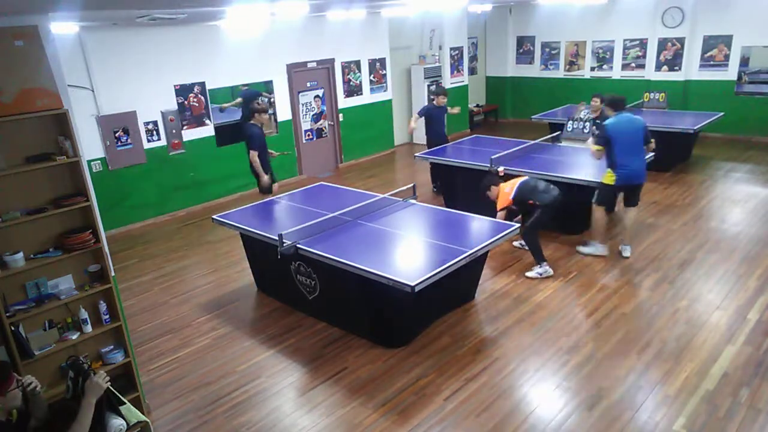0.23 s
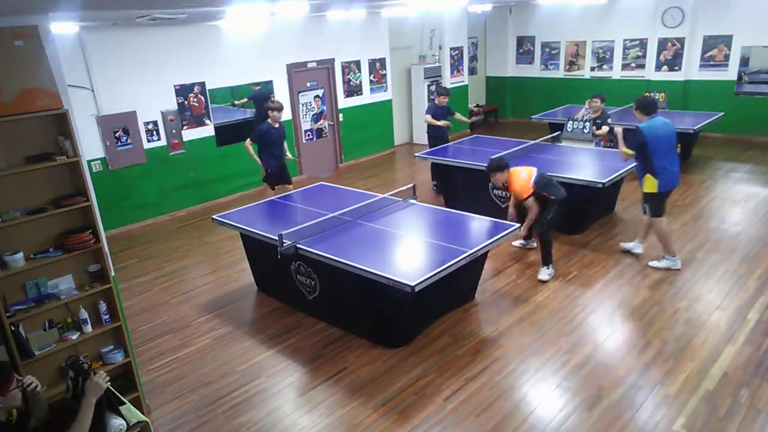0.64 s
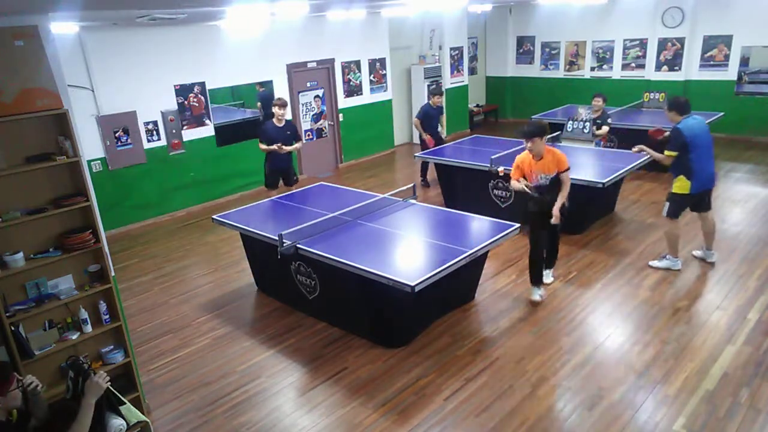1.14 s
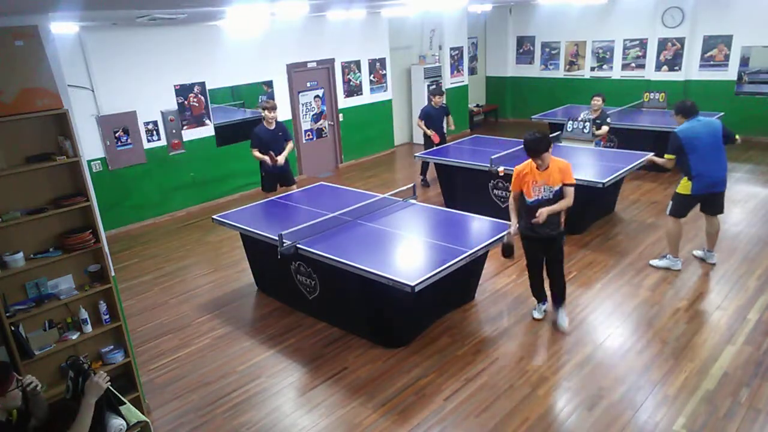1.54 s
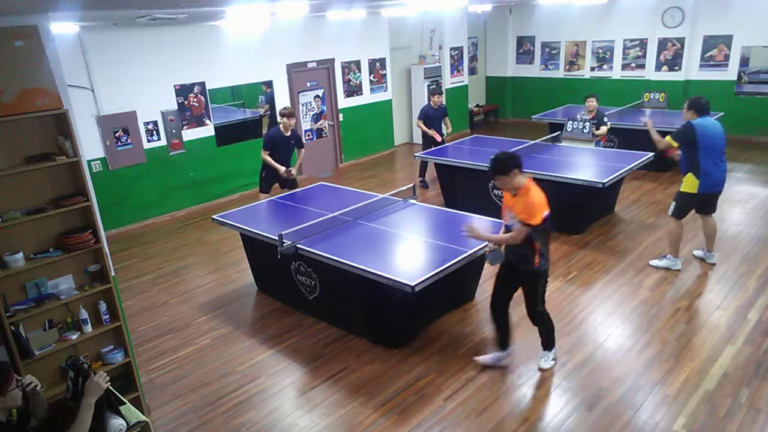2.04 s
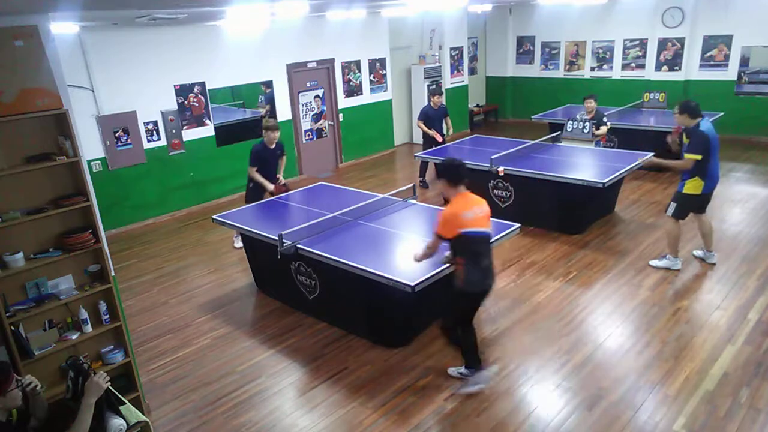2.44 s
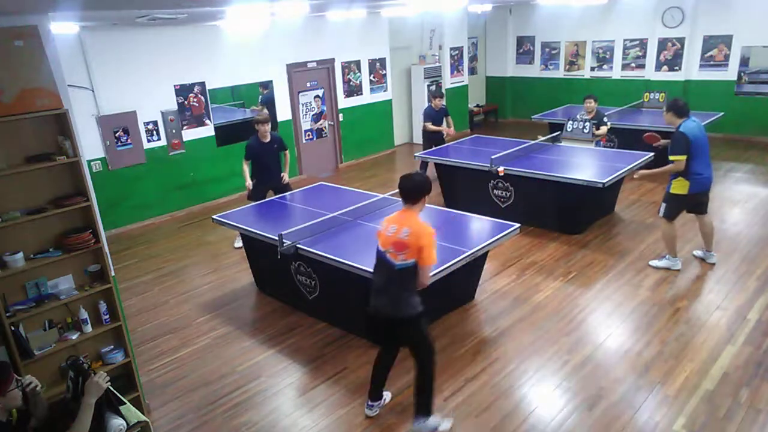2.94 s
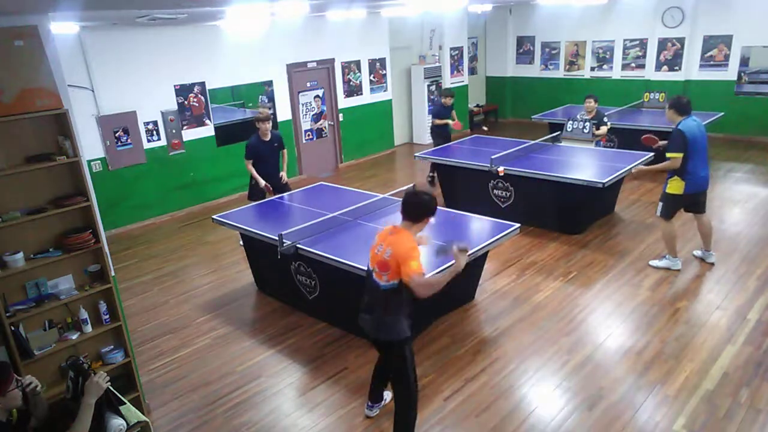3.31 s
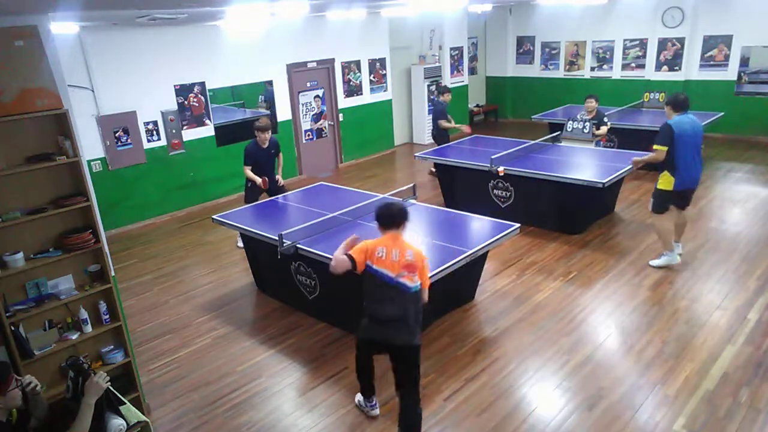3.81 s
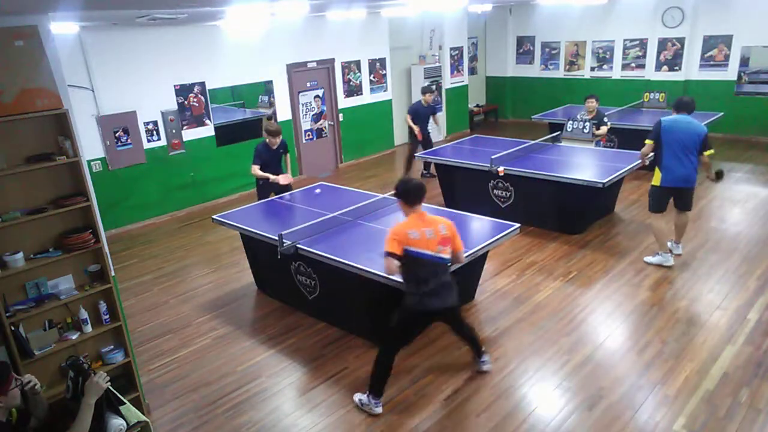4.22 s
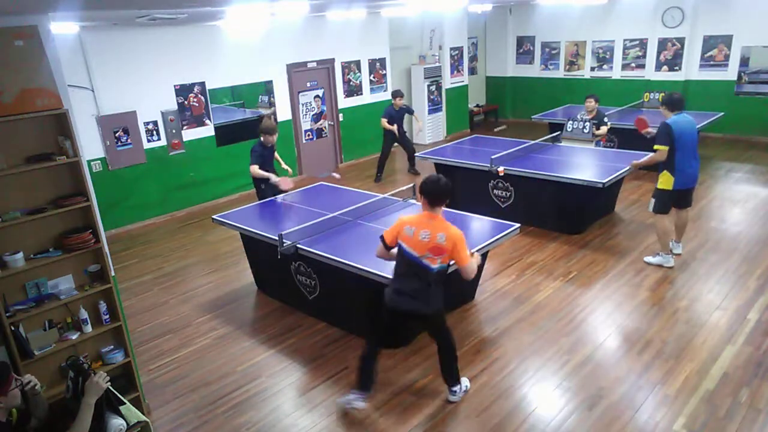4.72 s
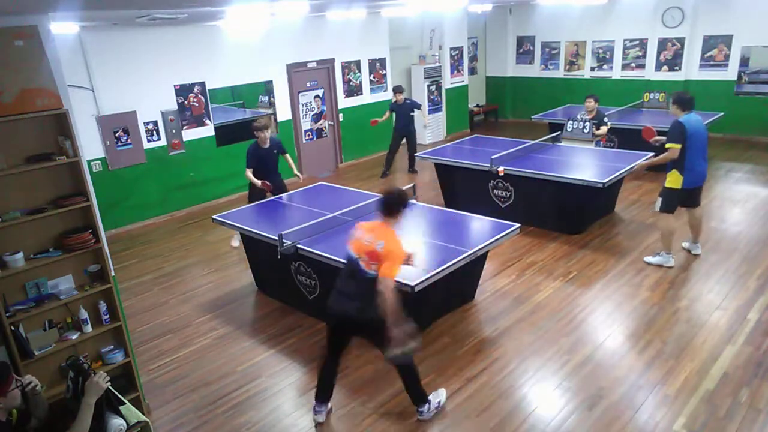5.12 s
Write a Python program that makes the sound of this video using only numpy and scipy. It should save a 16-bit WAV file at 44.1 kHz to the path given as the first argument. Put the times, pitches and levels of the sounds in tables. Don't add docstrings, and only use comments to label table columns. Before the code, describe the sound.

A shoe knocks onto wooden boards, followed by two ball bounces. Soles squeak briefly on varnish among faint distant knocks, then separate ball clicks lead to a quick run of bounces. A hollow serve and a heavy, slightly overloaded stamp open a closer rally with footsteps and scuffs. The hard hall rings around each click, heard by a distant microphone with noise suppression cutting the tails short.

```python
import sys
import numpy as np
from scipy import signal
from scipy.fft import rfft, irfft, next_fast_len
from scipy.io import wavfile
from scipy.ndimage import uniform_filter1d

SR = 44100
rng = np.random.default_rng(int(sys.argv[2]) if len(sys.argv) > 2 else 0)


def waveform_to_disk(signal):
    frames = np.transpose(np.atleast_2d(signal))
    scaled = np.clip(frames, -1, 1) * 32767
    samples = np.round(scaled).astype(np.int16)
    wavfile.write(sys.argv[1], SR, samples)


def undo_db(level):
    steps = np.asarray(level, float) / 20
    return 10 ** steps


N = 236420

# frequency [Hz], level [dB per Hz].
HUM = [(30, -54.5), (120, -23.5), (170, -13.5), (250, 2), (500, 1.5), (1000, -2), (2500, -9.5),
       (4200, -12.5), (5500, -12), (6800, -17), (9000, -29), (15000, -32.5)]


def along(points, hz):
    point_hz, value = np.transpose(points)
    return np.interp(np.log(hz + 1), np.log(point_hz + 1), value)


def peak(hz, centre_hz, width_hz):
    return 1 / np.sqrt(1 + (2 * (hz - centre_hz) / width_hz) ** 2)


def noise(gain):
    m = next_fast_len(N)
    spectrum = rfft(rng.standard_normal(m)) * gain(np.fft.rfftfreq(m, 1 / SR))
    x = irfft(spectrum, m)[:N]
    return x / x.std()


def swells(rows):
    t = np.arange(N) / SR
    gain = np.zeros(N)
    for s, db, rise_s, fall_s in rows:
        away = np.where(t < s, (s - t) / rise_s, (t - s) / fall_s)
        gain += undo_db(db - 20 * away)
    return gain


def ventilation():
    return undo_db(-47) * noise(lambda hz: undo_db(along(HUM, hz)))


def floor_boom():
    # loudest moment [s], level [dB], rise [s per 20 dB], fall [s per 20 dB].
    steps = [(.003, -47, 0.02, .012), (.07, -87, .04, .24), (.68, -78, 0.17, .14), (1.21, -78, .2, .13),
             (1.7, -76, 0.2, 0.23), (2.4, -77, .08, .2), (3.64, -72.5, 0.093, 0.45),
             (3.87, -57.5, 0.062, 0.78), (4.42, -86, 0.054, 0.16), (4.58, -53, 0.051, 0.16),
             (5, -72, 0.59, 0.35), (5.36, -87, 0.13, .1)]
    boards = noise(lambda hz: peak(hz, 91, 50) ** 2 + 1.4 * peak(hz, 115, 21) ** 2)
    return undo_db(2.5) * swells(steps) * boards


def slides():
    # loudest moment [s], level [dB], rise [s per 20 dB], fall [s per 20 dB].
    drags = [
        (.984, -59.5, .02, 0.033),
        (1.02, -63.5, .04, 0.11),
        (1.1, -55, 0.044, 0.12),
        (1.22, -65.5, 0.16, 0.11),
        (3.206, -55.5, 0.023, 0.03),
    ]
    # centre [Hz], width [Hz], level [dB].
    squeal = [(2265, 690, -0.5), (3810, 90, -2), (5300, 530, -10.5), (5550, 930, -2.5), (7200, 110, -4.5),
              (7800, 810, -26.5), (8270, 58, -9)]
    rubber = noise(lambda hz: sum(undo_db(db) * peak(hz, c, w) ** 2 for c, w, db in squeal))
    return undo_db(9) * swells(drags) * rubber


def causal(gain_db):
    cepstrum = irfft(np.log(undo_db(gain_db) + 1e-6))
    half = len(cepstrum) // 2
    cepstrum[1:half] *= 2
    cepstrum[half + 1:] = 0
    return irfft(np.exp(rfft(cepstrum)))[:half]


def click(colour_db, tilt_db, smear_s):
    hz, t = np.fft.rfftfreq(2048, 1 / SR), np.arange(400) / SR
    rough = rfft(rng.standard_normal(400) * t ** 2 * np.exp(-t / smear_s), 512)
    contact = irfft(rough / np.sqrt(np.abs(rough) + 1e-12))
    octaves = np.clip(np.log2((hz + 1) / 1000), -3.5, 2.4)
    x = np.convolve(causal(colour_db + tilt_db * octaves), contact)
    return x / np.abs(x).max()


def hall_tail():
    # frequency [Hz], decay time t60 [s], build-up [s].
    room = [(96.4, 0.37, 0.15), (300, 1.39, 0.019), (1040, 1.47, 0.01), (4230, 1.203, 0.0067),
            (8140, 0.81, 0.009), (14700, 0.39, 0.012)]
    hz, t, z = signal.stft(rng.standard_normal(SR), SR, nperseg=256)
    centre, t60, build = np.transpose(room)
    t60 = along(np.transpose([centre, t60]), hz)[:, None]
    build = along(np.transpose([centre, build]), hz)[:, None]
    z = z * undo_db(-60 * t / t60) * (1 - np.exp(-t / build))
    tail = signal.istft(z, SR, nperseg=256)[1][:SR]
    t = np.arange(SR) / SR
    lumps = np.repeat(rng.standard_normal(SR // 64 + 1), 64)[:SR]
    return tail * np.clip(t / 0.0025, 0, 1) * undo_db(6.4 * lumps * np.exp(-t / 0.016))


def blow_colour(body, band_db, knock_hz, knock_db, comb_hz, mirror):
    # low edge [Hz], high edge [Hz].
    bands = [(220, 361.5), (640, 1438), (2700, 5320), (7400, 11100)]
    hz = np.fft.rfftfreq(2048, 1 / SR)
    edges, width = np.ravel(bands), np.diff(bands)[:, 0]
    per_hz = np.array(band_db) - 10 * np.log10(width / (SR / 2))
    balance = along(np.transpose([edges, np.repeat(per_hz, 2)]), hz)
    share = mirror * np.clip(hz / 2200, 0, 1) ** 2
    comb = np.abs(1 + share * np.exp(2j * np.pi * hz / comb_hz))
    knock = knock_db * peak(hz, knock_hz, 0.15 * knock_hz)
    modes = uniform_filter1d(rng.standard_normal(len(hz)), size=7) * np.sqrt(7)
    modes *= 1.6 * np.clip(hz / 2500, .3, 1)
    octaves_below = np.clip(np.log2(edges[0] / (hz + 1)), 0, 2)
    light = 0.9 * min(per_hz[0] - per_hz[1], 0) * octaves_below
    return along(body, hz) + balance + 20 * np.log10(comb) + knock + modes + light


def strike(body, smear_s, wall_tilt_db, s, db, weight_db, bright_db, knock_hz, knock_db, comb_hz, mirror,
           tilt_db, direct_db, fizz_db, wall_db, wall_s):
    band_db = (db + weight_db, db, db + bright_db, db + fizz_db + bright_db)
    colour_db = blow_colour(body, band_db, knock_hz, knock_db, comb_hz, mirror)
    top_db = db + max(bright_db, 0) - 0.5
    direct = undo_db(top_db + direct_db) * click(colour_db, tilt_db, smear_s)
    tail = undo_db(-4.0) * signal.fftconvolve(causal(colour_db), hall_tail())
    first = undo_db(top_db + wall_db) * click(colour_db, wall_tilt_db, smear_s=.0008)
    second = undo_db(top_db + wall_db - 16) * click(colour_db, wall_tilt_db, smear_s=.0008)
    return [(s, direct), (s, tail), (s + wall_s, first), (s + 2 * wall_s, second)]


def kind(rows, own, **shared):
    columns = ("s", "db", "weight_db", "bright_db", own)
    return [dict(zip(columns, row), **shared) for row in rows]


def play(blows, body, smear_s, wall_tilt_db):
    out = np.zeros(N + 2 * SR)
    for blow in blows:
        for s, part in strike(body, smear_s, wall_tilt_db, **blow):
            out[round(s * SR):][:len(part)] += part
    return out[:N]


def shoes():
    # frequency [Hz], level [dB].
    sole = [(60, -62.5), (150, -14.5), (250, -1.5), (1500, -6.5), (2500, -2.5), (5200, 0), (6500, -3.5),
            (10000, -12.5), (14500, -29.5), (16000, -57)]
    # start [s], hall level [dB], weight = bass over knock [dB],
    # brightness = click over knock [dB], delay of the nearest wall [s].
    stamp = [
        (3.825, -21, 5, -2.9, .0095),
    ]
    steps_down = [
        (4.549, -31, 0.5, 3.7, .011),
        (5.354, -39, -13, 12.3, 0.0025),
    ]
    landing = [
        (.002, -24, -8.5, -5, .065),
    ]
    scuffs = [
        (2.679, -31, -33, -7.5, 0.013),
        (5.189, -32.5, -22.5, -8, 0.023),
    ]
    # the same columns, but the last is the knock's pitch [Hz].
    knocks = [
        (0.581, -70, -10, 13, 4100),
        (1.142, -54, -28, -19.5, 1055),
        (1.165, -48.5, -32, -13, 760),
        (1.316, -51, -27, -10, 2350),
        (1.318, -50.5, -42, -14.5, 1150),
        (2.376, -45.5, -24, 2.5, 1460),
        (3.419, -59.5, -8, 8.5, 2470),
    ]
    blows = (
        kind(stamp, "wall_s", knock_hz=320, knock_db=1.5, comb_hz=1730, mirror=0.2,
             tilt_db=3.5, direct_db=15.5, fizz_db=-13, wall_db=15.5)
        + kind(steps_down, "wall_s", knock_hz=393, knock_db=3, comb_hz=1540, mirror=0.087,
               tilt_db=2.0, direct_db=10.5, fizz_db=-9, wall_db=4)
        + kind(landing, "wall_s", knock_hz=707, knock_db=10.0, comb_hz=1576, mirror=0.067,
               tilt_db=-0.5, direct_db=13, fizz_db=-3.5, wall_db=-10)
        + kind(scuffs, "wall_s", knock_hz=1500, knock_db=-6, comb_hz=1650, mirror=.25,
               tilt_db=5, direct_db=6, fizz_db=6, wall_db=-5)
        + kind(knocks, "knock_hz", knock_db=11, comb_hz=1490, mirror=0.17,
               tilt_db=1.0, direct_db=20, fizz_db=-30, wall_db=18.5, wall_s=0.017))
    return play(blows, sole, smear_s=.0006, wall_tilt_db=2.5)


def balls():
    # frequency [Hz], level [dB].
    ball = [(100, -50), (200, -9), (600, -1.5), (1600, -4.5), (2300, -5), (5000, -7), (7400, -6), (8200, 3),
            (11000, -11), (14500, -23.5), (16000, -41.5)]
    # start [s], hall level [dB], weight = bass over knock [dB],
    # brightness = click over knock [dB], spacing of the mirror comb [Hz].
    far_bounces = [
        (.305, -30, -21, -5, 1762),
        (2.611, -29.5, -9, -5.5, 1464),
        (2.711, -29.5, -12, -6.5, 1650),
        (2.869, -25.5, -11.5, -8.5, 1550),
        (3.281, -25, -14.5, -9, 1664),
    ]
    near_bounces = [
        (.354, -34.5, -8.5, 4, 1883),
        (3.871, -25, 1.5, -0.5, 1500),
        (4.098, -28, -3, -4, 1480),
        (4.396, -27.5, -12.5, -6.5, 1444),
        (4.91, -24, -6.5, -7, 1623),
        (5.11, -28, -6.5, -5, 1550),
    ]
    # the same columns, but the last is the knock of the blade [Hz].
    pushes = [
        (3.726, -38.5, -6, 3, 980),
        (4.594, -33, 6.5, -1.5, 975),
        (5.306, -26, -13, -0.5, 1620),
    ]
    # the same columns, but the last is the delay of the nearest wall [s].
    toss = [
        (1.432, -30, -25, -1.5, .003),
    ]
    block = [
        (4.427, -29.5, -12, 0, .011),
    ]
    drive = [
        (1.651, -25.5, -7.5, 0.22, .012),
    ]
    serves = [
        (3.531, -23, -26.5, -3.5, 0.016),
    ]
    blows = (
        kind(far_bounces, "comb_hz", knock_hz=463, knock_db=1, mirror=0.55,
             tilt_db=2.5, direct_db=7.5, fizz_db=-2.5, wall_db=7, wall_s=.021)
        + kind(near_bounces, "comb_hz", knock_hz=1390, knock_db=4.5, mirror=0.37,
               tilt_db=2.0, direct_db=9.0, fizz_db=-2.5, wall_db=12.5, wall_s=.018)
        + kind(pushes, "knock_hz", knock_db=9.5, comb_hz=1490, mirror=0.11,
               tilt_db=3.5, direct_db=14.5, fizz_db=-9.5, wall_db=12, wall_s=0.0094)
        + kind(toss, "wall_s", knock_hz=1300, knock_db=3, comb_hz=1570, mirror=.5,
               tilt_db=6, direct_db=11, fizz_db=-6.5, wall_db=4)
        + kind(block, "wall_s", knock_hz=830, knock_db=13, comb_hz=1520, mirror=0.3,
               tilt_db=-3.5, direct_db=16.5, fizz_db=-8, wall_db=17)
        + kind(drive, "wall_s", knock_hz=1490, knock_db=2.0, comb_hz=1630, mirror=0.11,
               tilt_db=3, direct_db=19, fizz_db=-5.0, wall_db=12.5)
        + kind(serves, "wall_s", knock_hz=3550, knock_db=-23, comb_hz=2903, mirror=0.054,
               tilt_db=1.5, direct_db=6, fizz_db=-9.5, wall_db=11))
    return play(blows, ball, smear_s=.0007, wall_tilt_db=-2.5)


def port(x):
    # centre [Hz], width [Hz], depth [0-1].
    mic_dips = [(2363, 101, 0), (6570, 190, 0.24), (8930, 890, 0.75), (11700, 460, 0.08), (13030, 830, 0.8)]
    m = next_fast_len(N + 4096)
    hz = np.fft.rfftfreq(m, 1 / SR)
    gain = np.prod([1 - depth * peak(hz, c, w) ** 2 for c, w, depth in mic_dips], axis=0)
    return irfft(rfft(x, m) * gain, m)[:N]


def scene():
    background = ventilation() + floor_boom() + slides()
    return (background + port(shoes() + balls()))[None]


def capsule(x):
    # pinned from [s], to [s].
    overload = [
        (3.8375, 3.8398),
        (3.8433, 3.8468),
        (3.850, 3.8535),
    ]
    x = signal.sosfilt(signal.butter(3, 62, "high", fs=SR, output="sos"), x)
    slow = signal.sosfiltfilt(signal.butter(4, 900, fs=SR, output="sos"), x)
    t = np.arange(N) / SR
    pinned = sum(1. * ((t > a) & (t < b)) for a, b in overload)
    return slow + (x - slow) * (1 - uniform_filter1d(pinned, size=12))


def suppressor(x, noise_db, least_db, memory, harsh):
    # frequency [Hz], margin [dB].
    margin = [(100, -2), (160, 15), (300, 2), (550, 5.5), (1000, 3), (3000, 2.5), (6000, 1.5), (10000, 2),
              (15000, 3)]
    hz, _, z = signal.stft(x, SR, nperseg=1024, noverlap=896)
    shape = undo_db(along(HUM, hz)) ** 2
    expected = 0.73 * undo_db(noise_db + along(margin, hz)) ** 2 * shape / shape.sum()
    power = signal.lfilter([1 - memory], [1, -memory], np.abs(z) ** 2) + 1e-20
    wanted = np.clip(1 - expected[:, None] / power, 0, 1)
    gain = np.maximum(wanted ** harsh, undo_db(least_db))
    return signal.istft(z * gain, SR, nperseg=1024, noverlap=896)[1][..., :N]


def band_limit(x):
    return signal.sosfilt(signal.butter(12, 15770, fs=SR, output="sos"), x)


def record(dry):
    clean = suppressor(capsule(dry), noise_db=-46.5, least_db=-23, memory=0.927, harsh=3.23)
    return band_limit(clean)


dry = scene()
out = record(dry)
waveform_to_disk(out)
```